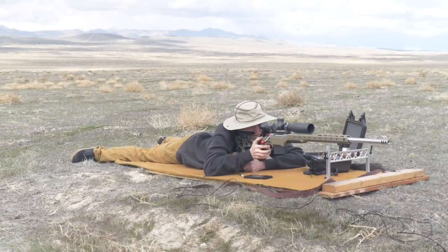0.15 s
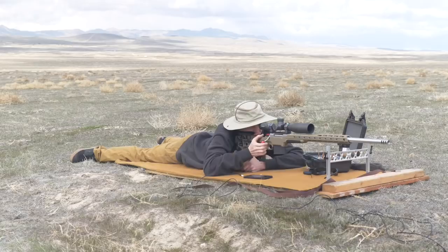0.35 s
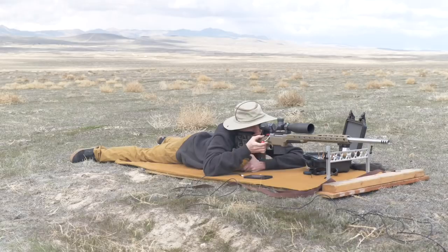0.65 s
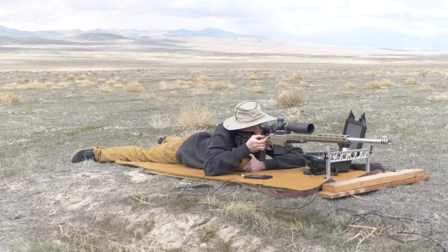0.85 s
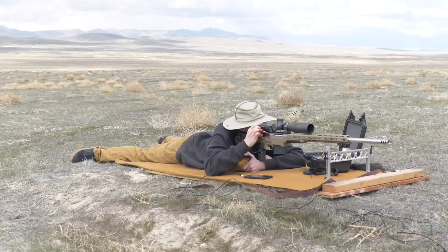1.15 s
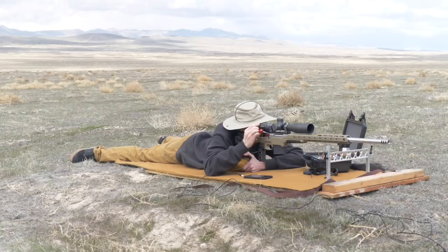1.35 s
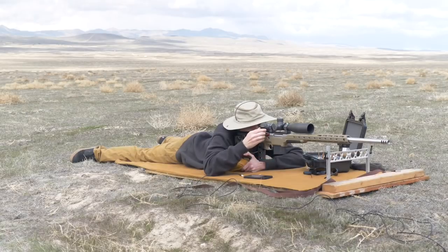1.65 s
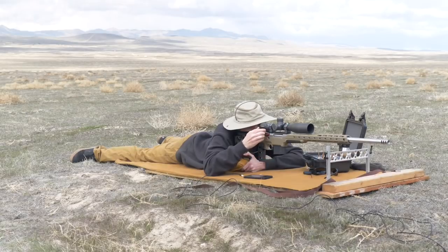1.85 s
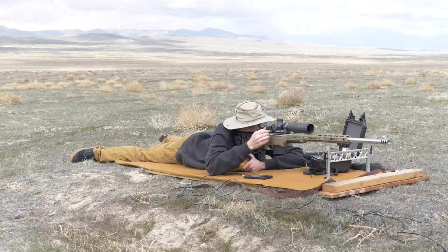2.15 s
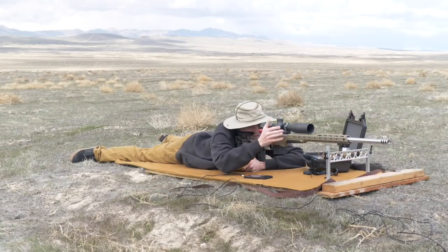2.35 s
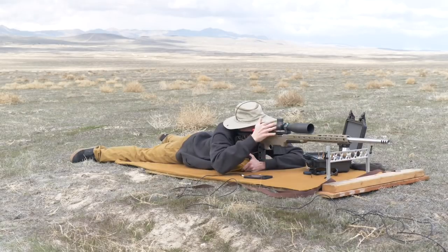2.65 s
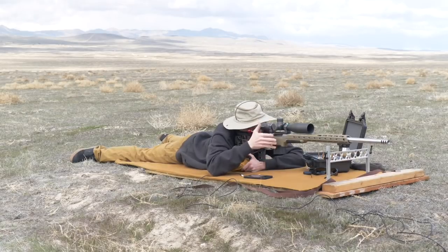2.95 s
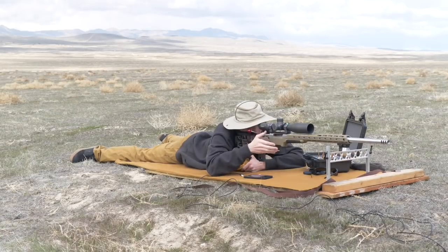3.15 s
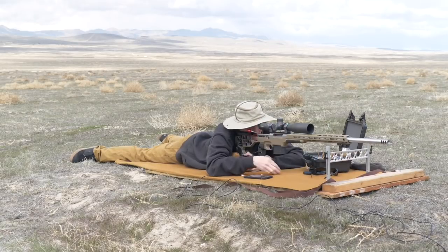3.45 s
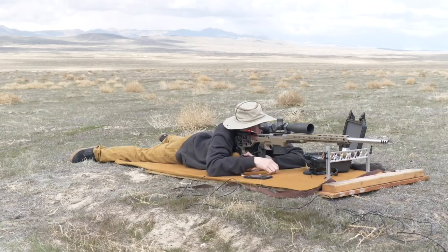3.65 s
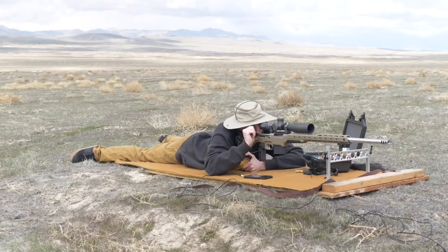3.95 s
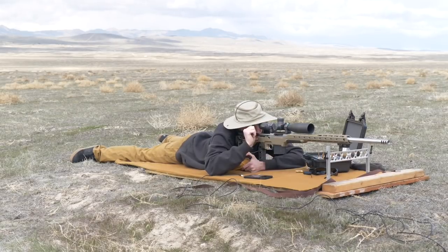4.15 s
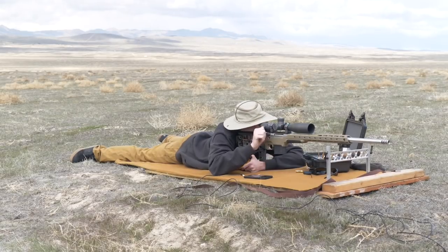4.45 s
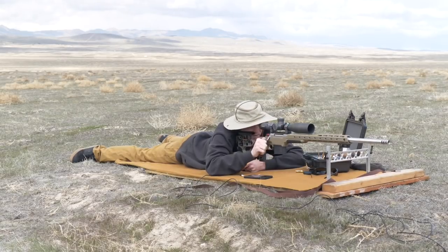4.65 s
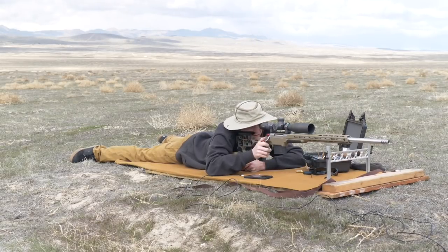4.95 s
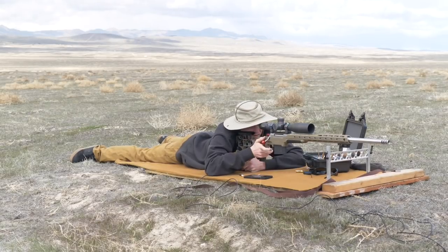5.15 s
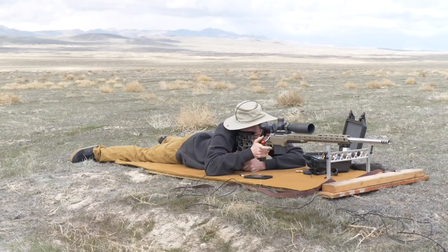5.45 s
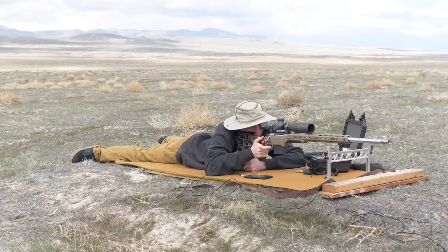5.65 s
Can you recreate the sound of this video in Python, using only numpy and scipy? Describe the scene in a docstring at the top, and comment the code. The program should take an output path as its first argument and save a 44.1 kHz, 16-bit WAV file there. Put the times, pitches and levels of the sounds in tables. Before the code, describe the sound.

Close, crisp steel clicks and scrapes of a rifle bolt being cycled, a spent case clinking, with soft wind buffeting and faint hiss.

```python
"""Wind buffets an open plain over faint hiss, as filtered noise; a hand rubs softly on a rifle.
Its bolt is lifted and drawn back: noisy cracks set decaying modes ringing, and gritty slips excite the rails.
The spent brass case bounces with high pings, cloth drags, and all sound dips briefly.
The bolt is pushed home with more knocks and scrapes; then the hand shifts and a far rumble swells."""
import sys
import numpy as np
from scipy import signal
from scipy.io import wavfile
from scipy.ndimage import uniform_filter1d

SR = 44100
rng = np.random.default_rng(int(sys.argv[2]) if len(sys.argv) > 2 else 0)


def master(y):
    """Save y as 16-bit WAV."""
    cut = np.clip(np.atleast_2d(y).T, -1, 1)
    pcm = np.round(cut * 32767)  # scale
    wavfile.write(sys.argv[1], SR, pcm.astype(np.int16))


N = 256220

# Resonances of the hollow stock. Each row: frequency in Hz, width in Hz, level in dB.
STOCK = [(509, 120, -3.5), (670, 290, 1.5), (998, 110, 6.5)]


def amp(db):
    """Level law: decibels become an amplitude ratio."""
    return 10 ** (np.asarray(db) / 20)


def evened(x):
    """Power normalisation: scales a signal to rms 1."""
    return x / np.sqrt(np.mean(x ** 2) + 1e-20)


def add(mix, start_s, sound):
    """Superposition: adds a sound to the mix from its start onward."""
    part = mix[round(start_s * SR):][:len(sound)]
    part += sound[:len(part)]


def band(x, lo_hz, hi_hz):
    """Band-pass filtering: keeps the energy between two corner frequencies."""
    corners = [lo_hz, min(hi_hz, SR / 2.1)]
    return signal.sosfilt(signal.butter(2, corners, "band", fs=SR, output="sos"), x)


def resonate(x, hz, width_hz):
    """Complex resonance by heterodyning: shifts hz down to zero, smooths, and shifts back."""
    turn = np.exp(2j * np.pi * np.cumsum(hz * np.ones(len(x))) / SR)
    r = np.exp(-np.pi * width_hz / SR)
    return 2 * turn * signal.lfilter([1 - r], [1, -r], x / turn + 1e-18)


def body(x, peaks):
    """Parallel resonances of a solid body; neighbours have opposite sign."""
    total = 0
    for k, (hz, width_hz, db) in enumerate(peaks):
        total = total + (-1) ** k * amp(db) * resonate(x, hz, width_hz).real
    return evened(total)


def ring(modes, t, hz=1.0, reach_db=0):
    """Modal decay: dying sines, weaker by up to reach_db away from hz, with shares differing at each blow."""
    f, db, t60 = np.transpose(modes)[:, :, None]
    phase, luck = rng.random((len(modes), 2)).T[:, :, None]
    distance = np.minimum(abs(np.log2(f / hz)) / 0.31, 1)  # full loss from 0.31 octave away
    db = db - reach_db * distance + 5 * (luck - .5)
    return (amp(db - 60 * t / t60) * np.sin(2 * np.pi * (f * t + phase))).sum(axis=0)


def noise(points, patchy_db):
    """Spectral synthesis: random short-time spectra of a given colour with drifting patches."""
    frames, hz = N // 512 + 5, np.fft.rfftfreq(2048, 1 / SR)
    real, imaginary, patches = rng.standard_normal((frames, 1025, 3)).T
    patches = uniform_filter1d(patches, size=10, axis=0)
    patches = evened(uniform_filter1d(patches, size=6, axis=1))
    f, db = np.transpose(points)
    colour = np.interp(np.log(hz + 1), np.log(f), db)[:, None]
    spectra = (real + 1j * imaginary) * amp(colour + patchy_db * patches)
    return evened(signal.istft(spectra, nperseg=2048, noverlap=1536)[1][:N])


def wind():
    """Turbulence as coloured noise; a ground echo combs the far rumble with evenly spaced notches."""
    # Each row: time in seconds, then levels of buffeting, far rumble and rush in dB.
    wind_levels = [(0.0, -37.5, -52, -53.5), (1.25, -34.5, -49, -47), (2.28, -40, -50.5, -57.5),
                   (3.27, -31.5, -42, -47.5), (3.75, -36, -46.5, -54.5), (4.95, -41, -39.5, -56.5),
                   (5.53, -43, -30, -59.5), (5.81, -45, -36.5, -74)]
    # Spectrum of the buffeting. Each row: frequency in Hz, density in dB per Hz.
    buffet_colour = [(6, -29), (25, -5), (40, 3.5), (70, -0.5), (120, -7.5), (300, -24), (800, -45),
                     (2000, -81)]
    # Spectrum of the far rumble. Each row: frequency in Hz, density in dB per Hz.
    rumble_colour = [(60, -22.5), (140, -1), (220, -2), (330, -7), (440, -22), (600, -27.5), (1000, -37),
                     (1200, -51.5), (2500, -90)]
    # Spectrum of the rush. Each row: frequency in Hz, density in dB per Hz.
    rush_colour = [(100, -4), (300, -0.5), (440, -1.5), (520, -10.5), (1000, -21.5), (1500, -26),
                   (2500, -38.5), (5000, -55)]
    echo_s, echo_gain = .00495, 0.65
    t = np.arange(N) / SR
    times, *columns = np.transpose(wind_levels)
    buffet_db, rumble_db, rush_db = (np.interp(t, times, column) for column in columns)
    rumble = noise(rumble_colour, patchy_db=2.0)
    rumble = evened(rumble + echo_gain * np.roll(rumble, round(echo_s * SR)))
    buffet = noise(buffet_colour, patchy_db=1.5)
    rush = noise(rush_colour, patchy_db=4.0)
    return amp(buffet_db) * buffet + amp(rumble_db) * rumble + amp(rush_db) * rush


def microphone_hiss():
    """Self-noise: steady coloured noise."""
    # Spectrum of the hiss. Each row: frequency in Hz, density in dB per Hz.
    hiss_colour = [(880, -27.5), (1500, -4.5), (2880, -7), (3250, -4), (5220, -13), (14100, -15.5),
                   (16000, -10)]
    return amp(-75) * noise(hiss_colour, patchy_db=0)


def grip(start_s, swell_s, fade_s, db, hz):
    """Friction of a hand shifting on the rifle: soft rubbing noise in one broad resonance."""
    edge_db = -16.5  # the ends of the swell and fade, relative to the top
    rub = rng.standard_normal(SR)[:round((swell_s + fade_s) * SR)]
    t = np.arange(len(rub)) / SR
    shape = amp(db + edge_db * np.maximum(1 - t / swell_s, (t - swell_s) / fade_s))
    rustle = evened(resonate(resonate(rub, hz, 1400).real, hz, 1400).real)
    sound = rustle + 0.17 * evened(band(rub, 1200, 3100))
    return start_s, shape * sound * signal.windows.tukey(len(rub), .2)


def crack(x, hz):
    """Contact noise: two resonances in series at the contact pitch, over a thin wider band."""
    width_hz = 0.35 * hz
    contact = resonate(resonate(x, hz, width_hz).real, hz, width_hz).real
    return evened(contact + 0.17 * band(x, 1500, 4300))


def rattle(t):
    """Free vibration of loose parts: a new scatter of 24 modes at each blow."""
    t60_s = 0.062  # scaled by 0.5 to 1.5 for each part
    loose = [(1700 + 5500 * u ** 1.5, -8 * v, t60_s * (.5 + w)) for u, v, w in rng.random((24, 3))]
    return amp(-31.5) * ring(loose, t)


def pins(t, t60):
    """Short high modes of pins and springs: a new scatter of 16 at each blow."""
    small = [(4300 + 11000 * u ** 2.2, -8 * v, 0.6 * t60) for u, v in rng.random((16, 2))]
    return amp(-14) * ring(small, t)


def steel_ring(t, hz, t60):
    """Contact damping: the looser the contact (longer crack), the freer the struck steel rings."""
    # Modes of the steel. Each row: frequency in Hz, level in dB, t60 in seconds.
    steel_modes = [(2027, -9, .07), (2273, 0, .085), (3097, -2, .04), (3290, -7, .05), (3660, 3, .06),
                   (3780, -3, .045), (4230, -8, .05), (4600, -8, .06), (5150, -12, .04), (5600, -16, .05)]
    ring_db = 0.5 + 5.5 * np.log2(max(t60, .004) / 0.063)  # gains 5.5 dB per doubling of t60
    return amp(ring_db) * ring(steel_modes, t, hz, reach_db=20)


def barrel_ring(t, start_s, by_case):
    """Long modal decay of the barrel, shared out by the striker and narrowed once the bolt is home."""
    # Each row: frequency in Hz, level in dB when the bolt strikes, level in dB when the case strikes,
    # t60 in seconds.
    barrel_modes = [(1075, -4, -30, .2), (1190, -9, -30, .3), (1970, -6, -20, .16), (2487, -24, -5, .18),
                    (2724, -3.5, 0, .33), (3472, -40, -20, .9), (3580, -6, -16, .2)]
    locked_s, locked_hz, locked_db = 4.49, 1150, 12  # modes far from this pitch lose this much afterwards
    modes = [(f, case_db if by_case else bolt_db, t60) for f, bolt_db, case_db, t60 in barrel_modes]
    return ring(modes, t, locked_hz, reach_db=locked_db * (start_s > locked_s))


def case_ping(t):
    """Free vibration of the struck brass case: a few high modes."""
    # Modes of the case. Each row: frequency in Hz, level in dB, t60 in seconds.
    brass_modes = [(6745, -15, .12), (9636, 0, .17), (15085, -1, .13), (15350, -2, .16)]
    return ring(brass_modes, t)


def blow(peak_s, db, hz, thud_db, treble_db, t60, barrel_db=-28.5, brass_db=None):
    """Impact excitation: a noisy crack, thud and treble tick, with the modes of the struck parts."""
    rise_s = .0013
    barrel_per_db = 0.07  # harder blows put a larger share into the barrel (dB per dB of level)
    t = np.arange(SR // 2) / SR
    crack_noise, thud_noise, tick_noise = rng.standard_normal((3, len(t)))
    onset = np.minimum(t / rise_s, 1) ** 2
    fall = amp(-60 * np.maximum(t - rise_s, 0) / max(t60, .004))
    tick = evened(band(tick_noise, 3200, 15500))
    thud = body(thud_noise, STOCK)
    sound = .5 * fall * (crack(crack_noise, hz) + amp(treble_db) * tick + amp(thud_db) * thud)
    sound += rattle(t) + steel_ring(t, hz, t60)
    sound += amp(barrel_db + barrel_per_db * db) * barrel_ring(t, peak_s, brass_db is not None)
    sound += amp(treble_db) * pins(t, t60)
    if brass_db is not None:
        sound += amp(brass_db) * case_ping(t)
    return peak_s - rise_s, amp(db) * onset * sound


def slide(start_s, swell_s, hold_s, t60, db, treble_db, stock_db):
    """Stick-slip friction: clumped gritty slips over a thin rub excite rails, stock and a bright fizz."""
    # Resonances of the rails. Each row: frequency in Hz, width in Hz, level in dB.
    rail_peaks = [(2110, 300, -5.5), (2620, 110, 0.5), (3320, 1100, -9), (3830, 190, 1)]
    t = np.arange(SR // 2) / SR
    swell = np.minimum(t / swell_s, 1) ** 3.5  # a high power gathers force late
    force = swell * amp(-60 * np.maximum(t - swell_s - hold_s, 0) / t60)
    rub = rng.standard_normal((3, len(t)))
    chance, size = rng.random((2, len(t)))
    grit = (chance < 1200 / SR) * amp(-5. * np.log(size + 0.022))  # about 1200 grains per second
    clumps = amp(2.8 * evened(uniform_filter1d(rng.standard_normal(len(t)), size=150)))
    rail_slips, fizz_slips, stock_slips = rub * clumps * (0.56 + grit)
    scrape = body(rail_slips, rail_peaks) + 0.2 * evened(band(rail_slips, 1300, 8300))
    fizz = evened(band(fizz_slips, 5400, 17000))
    sound = scrape + amp(treble_db) * fizz + amp(stock_db) * body(stock_slips, STOCK)
    return start_s, amp(db) * force * sound


def sleeve():
    """Broadband friction: cloth dragged over the mat as a soft rustle."""
    # One drag: start in seconds, length in seconds, level in dB.
    drag = (3.44, 0.38, -71)
    start_s, length_s, db = drag
    rub = rng.standard_normal(SR)[:round(length_s * SR)]
    return start_s, amp(db) * evened(band(rub, 1600, 12600)) * signal.windows.tukey(len(rub), .6)


def scene():
    """Superposition: every source adds at one microphone, copied to two channels."""
    # A hand shifting on the rifle. Each row: start in seconds, swell in seconds, fade in seconds,
    # level in dB, rustle centre in Hz.
    grips = [(0.081, 0.15, 0.046, -71.5, 2720), (0.522, 0.1, 0.027, -64, 2200),
             (0.862, 0.11, 0.19, -68.5, 1620), (1.158, 0.063, 0.2, -58, 1440), (2.12, .1, 0.11, -70, 2710),
             (4.971, 0.16, 0.25, -66, 3755)]
    # Steel parts meeting. Each row: time of the attack's top in seconds, level in dB, contact pitch in Hz,
    # stock thud in dB, treble in dB, crack t60 in seconds.
    knocks = [(0.78, -50, 2950, -20, -20, 0.03), (0.792, -47.5, 3330, -24, -11, 0.073),
              (1.1033, -43.5, 3480, 10.5, -25, 0.017), (1.131, -17.5, 2168, 0, -11.5, 0.013),
              (1.1496, -8.5, 2690, -23.5, -6, 0.028), (1.171, -32, 4100, -20, -28.5, 0.037),
              (1.3194, -48, 2450, -4, -28.5, 0.058), (1.6887, -61.5, 2200, 10.5, -28, 0.045),
              (2.4971, -43, 2440, -1.5, -37, 0.076), (2.5611, -54, 1930, 6, -33, 0.064),
              (2.601, -57, 3740, 6, -9, 0.074), (2.6611, -26.5, 2621, -52, -20.5, 0.044),
              (2.7125, -25.5, 2550, -10, -21, 0.1), (2.7633, -11.5, 3675, -1.5, -1.5, 0.0077),
              (2.7714, -27.5, 3490, -4, -31.5, 0.048), (2.81, -26.5, 3440, -2, -32, 0.065),
              (2.8383, -24, 2850, -4, -32, 0.063), (4.0811, -49.5, 2180, 8, -44, 0.087),
              (4.2724, -35, 2530, 3, -52.5, 0.042), (4.33, -58.5, 3500, 16, -28.5, 0.059),
              (4.3655, -37.5, 1870, -13, -35.5, 0.044), (4.394, -6.5, 557.5, -22.5, -40.5, 0.033),
              (4.397, -17, 1050, -20, -40, 0.05), (4.3945, -23.5, 3840, 16.5, -27.5, 0.09),
              (4.4166, -11.5, 3120, -3, -24.5, 0.013), (4.429, -17.5, 2570, -20, -22.5, 0.11),
              (4.451, -19, 3200, -23.5, -28, 0.076), (4.4864, -27.5, 5060, -14, -3, 0.034),
              (4.4997, -10, 2900, -34, -38.5, 0.024), (4.6208, -35, 3030, -3, -7, 0.038),
              (4.647, -29.5, 3200, -24, -6, 0.037), (4.7018, -20.5, 2840, -11.5, -36.5, 0.017)]
    # The bolt sliding in its rails. Each row: start in seconds, swell in seconds, hold in seconds,
    # fall t60 in seconds, scrape level in dB, treble in dB, stock in dB.
    slides = [(1.112, .02, 0.025, 0.049, -27.5, -25, -6.5), (2.5, 0.13, 0.19, .05, -53, -37, -6),
              (2.741, 0.0042, 0.035, 0.22, -34.5, -39, -9), (4.175, 0.093, 0.0018, .25, -59.5, -19, -6),
              (4.301, 0.096, .002, 0.046, -41.5, -31, -1), (4.386, 0.0071, 0.022, 0.2, -20.5, -12, -4),
              (4.476, 0.0074, 0.024, 0.05, -33, -9, -15.5), (4.592, 0.031, 0.0018, 0.16, -45, -29, -4),
              (4.676, 0.019, .002, 0.11, -48, -10, 2.5)]
    # The case striking steel. Each row: the columns of the knocks, then barrel in dB, brass ping in dB.
    bounces = [(2.6823, -26.5, 2546, -17.5, -22.5, 0.057, -33.5, -21.5),
               (2.7561, -12, 3600, -27, -15, 0.09, -29, -25.5),
               (2.9614, -16, 2280, -25, -42, 0.044, -38.5, -23.5),
               (3.1346, -26.5, 3981, -15, -29.5, 0.032, -30.5, -29.5),
               (3.2133, -7.5, 3520, -5, -40.5, 0.017, -37, -64),
               (3.231, -41.5, 2870, -4, -21, 0.055, -23, -40),
               (3.3262, -17, 2440, -19.5, -28.5, 0.036, -21.5, -35),
               (3.4162, -47, 2700, 9, -26, 0.027, -15, -23)]
    near = np.zeros(N)
    for row in grips:
        add(near, *grip(*row))
    for row in knocks + bounces:
        add(near, *blow(*row))
    for row in slides:
        add(near, *slide(*row))
    add(near, *sleeve())
    mono = near + wind() + microphone_hiss()
    return np.array([mono, mono])


def record(dry):
    """Saturation and band-limiting: separate amplifier hiss, a brief level dip, soft overload, treble cut."""
    dip_s, dip_half_s = 3.8, 0.03  # all sound fades out and in again around dip_s
    edge_hz = 16000
    fade = np.clip(abs(np.arange(N) / SR - dip_s) / dip_half_s, .02, 1)
    hiss = band(band(rng.standard_normal((2, N)), 2300, 19000), 2300, 19000)
    hiss = amp(-75) * evened(hiss)
    out = 0.79 * np.tanh(fade * (dry + hiss) / 0.72)
    low_pass = signal.firwin(511, edge_hz, window=("kaiser", 9), fs=SR)
    return signal.oaconvolve(out, low_pass[None], "same")


dry = scene()
out = record(dry)
master(out)
```